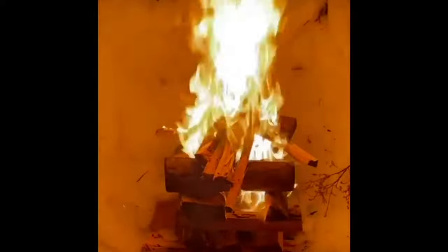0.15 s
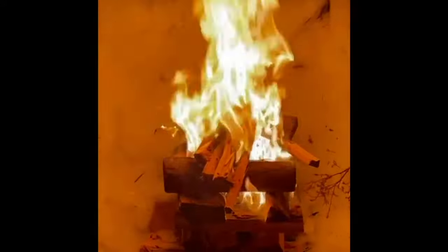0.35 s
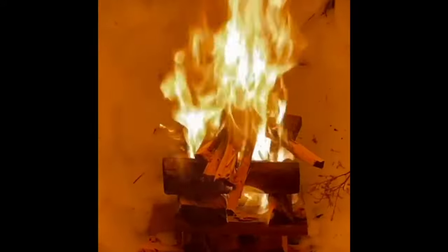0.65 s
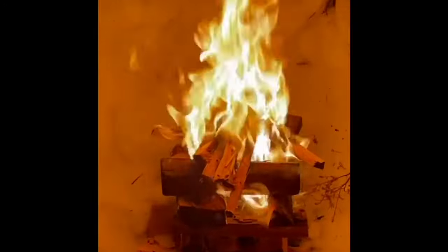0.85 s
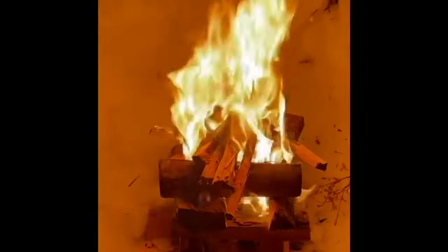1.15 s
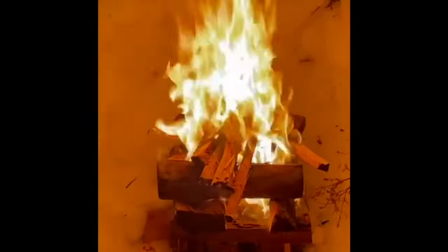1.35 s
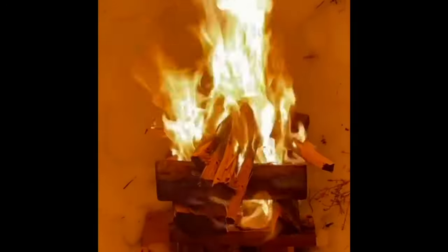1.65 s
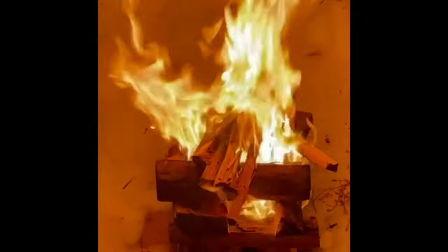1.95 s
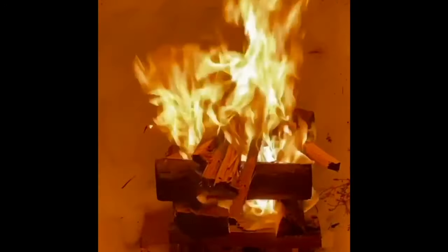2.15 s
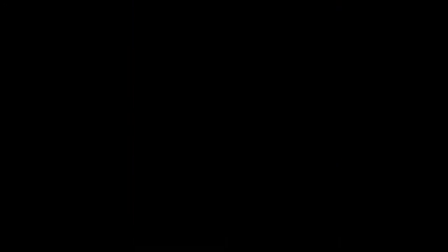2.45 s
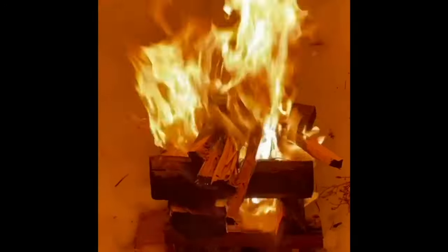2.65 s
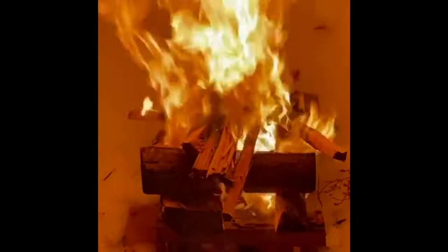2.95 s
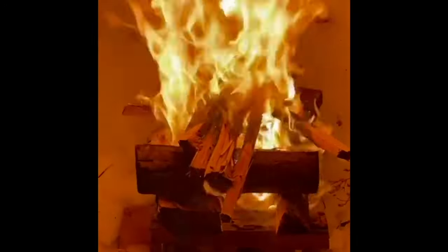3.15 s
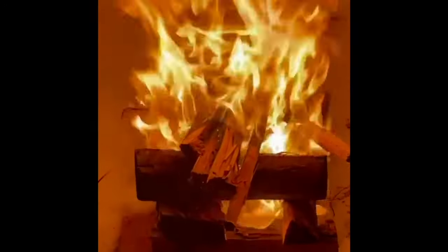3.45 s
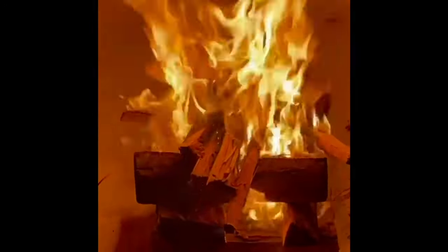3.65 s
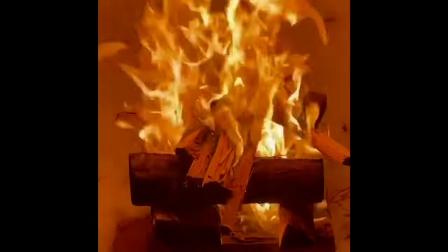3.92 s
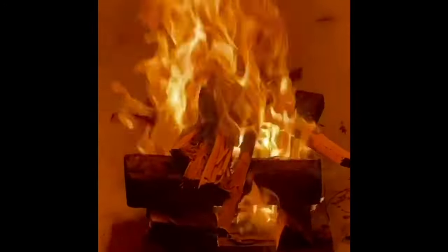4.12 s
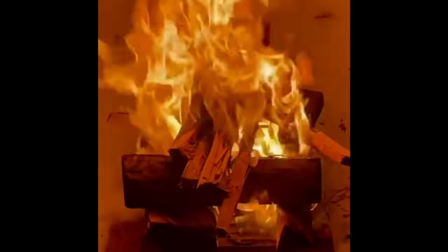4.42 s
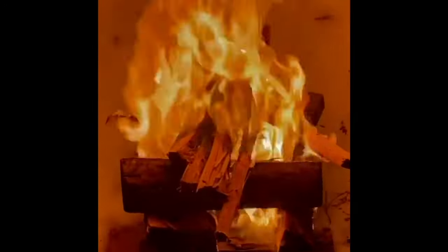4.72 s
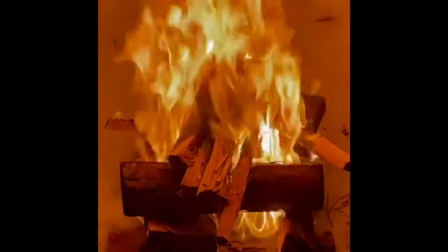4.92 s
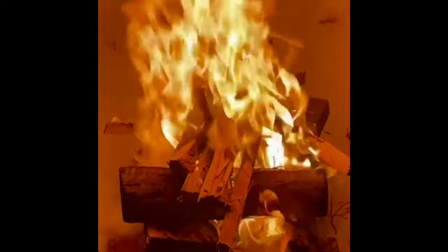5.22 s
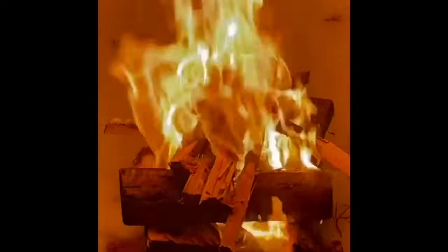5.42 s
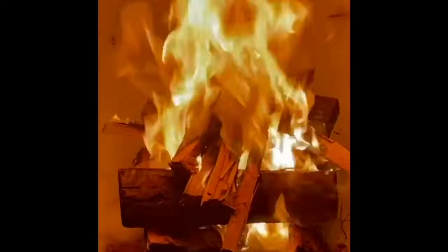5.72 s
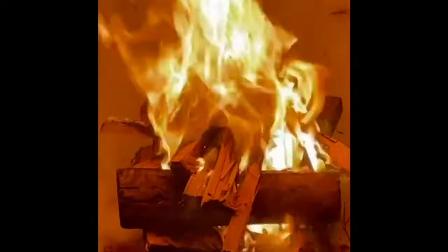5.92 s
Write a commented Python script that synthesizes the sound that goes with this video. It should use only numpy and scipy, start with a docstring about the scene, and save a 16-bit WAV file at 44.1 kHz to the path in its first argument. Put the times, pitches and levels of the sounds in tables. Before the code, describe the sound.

Burning split logs rumble softly and hiss thinly while dry, irregular cracks snap out, the loudest near one, three and six seconds.

```python
"""Brisk log fire outdoors

A stack of split logs burns close to the microphone. Shaped noise makes the rumble, the flickering
draught, the sputtering gas jets and a thin steady hiss. Cells of the wood burst in sharp pops: a spike
with a short tear, ringing through the hollows of the stack, and a quick echo off the logs and the ground.
Pockets of gas escape as soft thumps of falling pitch, most of them in the first second.
Early on, the sound drops out for an instant; the treble stops near 16 kHz throughout."""
import sys
import numpy as np
from scipy import signal
from scipy.fft import rfft, irfft
from scipy.io import wavfile
from scipy.ndimage import uniform_filter1d

SR = 44100
rng = np.random.default_rng(int(sys.argv[2]) if len(sys.argv) > 2 else 0)


def master_out(mix):
    """Clip the mix to full scale and print it as 16-bit PCM to the path in sys.argv[1]."""
    frames = np.transpose(np.atleast_2d(mix))
    ceiling = np.clip(frames, -1, 1)
    pcm = np.round(ceiling * 32767).astype(np.int16)
    wavfile.write(sys.argv[1], SR, pcm)


N = 268128
TIME = np.arange(N) / SR
POP_SIZE = 4096   # samples in one pop
JETS_CALM_DB = -66.5   # gas jets between bouts, before trim; also the most they can blow smoothly


def from_db(db):
    """Decibels to gain."""
    return 10 ** (np.asarray(db) / 20)


def rms_one(x):
    """Scale to an rms of 1."""
    return x / np.sqrt(np.mean(x ** 2) + 1e-20)


def unit_energy(x):
    """Scale to the energy of a single unit click."""
    return x / np.sqrt(np.sum(x ** 2) + 1e-20)


def colour_db(points, size):
    """Level at each frequency of a transform of this size, joined up along a log frequency axis."""
    hz, db = np.transpose(points)
    return np.interp(np.log(np.fft.rfftfreq(size, 1 / SR) + 1), np.log(hz), db)


def coloured(x, points):
    """Give a flat excitation a colour; rms 1."""
    return rms_one(irfft(rfft(x) * from_db(colour_db(points, N)), N))


def noise(points):
    """Steady noise of a given colour; rms 1."""
    return coloured(rng.standard_normal(N), points)


def drift(rate_hz):
    """Smooth random wander with a spread of 1; its spectrum fades out around the given rate."""
    keep = np.exp(-(np.fft.rfftfreq(N, 1 / SR) / rate_hz) ** 2)
    return rms_one(irfft(rfft(rng.standard_normal(N)) * keep, N))


def ring_through(x, db):
    """Minimum-phase filter: resonances ring only after the blow."""
    cepstrum = irfft(np.log(from_db(db)))
    # fold the cepstrum onto positive times
    cepstrum[1:len(x) // 2] *= 2
    cepstrum[len(x) // 2 + 1:] = 0
    return irfft(rfft(x) * np.exp(rfft(cepstrum)))


def add(out, s, sound):
    """Mix a sound in at a time in seconds."""
    start = int(np.clip(round(s * SR), 0, N - 1))
    out[start:start + len(sound)] += sound[:N - start]


def flames(rush_trim_db=-0.97, jets_trim_db=-2.0, rush_flicker_db=2.57, jet_flicker_db=1.0, even_s=0.091):
    """Turbulent burning: a deep rumble, the flickering draught and sputtering jets."""
    # slow swell, before billow and trim: t/s, rumble level/dB, draught level/dB
    swell = [(0.0, -44.5, -63), (0.12, -47.5, -62), (0.32, -43, -61.5), (0.42, -45.0, -62.5),
             (0.78, -47.5, -62.0), (0.88, -43, -63.0), (1.22, -47, -62.5), (1.34, -44.0, -58.5),
             (2.1, -45.5, -62), (2.32, -44.5, -60), (2.56, -48.5, -62.5), (2.86, -43.5, -60.5),
             (3.24, -44.5, -63.0), (3.38, -43.5, -59), (3.6, -46.5, -61.5), (3.74, -45.5, -61.5),
             (5.12, -46.5, -61.5), (5.46, -46, -66.5), (5.72, -46, -62.0), (6.06, -44.5, -61.5)]
    # colour of the rumble: f/Hz, relative level/dB
    rumble_colour = [(15, -47), (25, -33), (40, -6.5), (58, 2), (76, -1.5), (108, -7), (150, -10.5),
                     (190, -12.5), (235, -23), (330, -30.5), (700, -75)]
    # colour of the draught: f/Hz, relative level/dB
    rush_colour = [(150, -13.5), (250, 3), (340, 1), (410, -2.5), (490, 0.5), (620, -2.5), (780, -9.5),
                   (1000, -17.5), (2000, -26.5)]
    rumble_billow_db, rush_billow_db = 1.5, 1.0

    swell_s, rumble_points, rush_points = np.transpose(swell)
    rumble_db = np.interp(TIME, swell_s, rumble_points)
    rush_db = np.interp(TIME, swell_s, rush_points) + rush_trim_db

    billow = drift(7.5)   # on top of the swell the flames billow at random
    licks = drift(47)   # each tongue of flame stirs draught and jets together
    rumble = noise(rumble_colour)
    # even out the noise's own level, leaving swell and billow to shape it
    rumble /= np.sqrt(uniform_filter1d(rumble ** 2, int(even_s * SR)) + 1e-6)
    rumble *= from_db(rumble_db + rumble_billow_db * billow)
    rush = noise(rush_colour) * from_db(rush_db + rush_billow_db * billow + rush_flicker_db * licks)
    jets = sputter(jet_level() + jets_trim_db + jet_flicker_db * licks)
    return rumble + rush + jets


def jet_level(edge_s=0.042):
    """The gas jets idle; each bout opens, holds and closes again. In dB, before trim and flicker."""
    # bouts of sputtering: t/s, length/s, level/dB
    bouts = [(0.88, 0.24, -64.5), (1.278, 0.29, -61.5), (1.674, 0.24, -63), (2.072, 0.256, -60),
             (3.642, 0.11, -61.5)]
    db = np.full(N, JETS_CALM_DB)
    for s, length_s, bout_db in bouts:
        inside_s = np.minimum(TIME - s, s + length_s - TIME)   # time from the nearer edge
        opening = np.clip(0.5 + inside_s / edge_s, 0, 1)
        db = db + opening * (bout_db - JETS_CALM_DB)
    return db


def sputter(level_db, count=700, size_spread_db=4.5):
    """Small gas jets blow smoothly when calm; whatever they push out beyond that comes in separate spits."""
    # colour of the jets: f/Hz, relative level/dB
    jet_colour = [(450, -16), (800, 0), (1100, 2.5), (1600, -0.5), (2000, -1), (2800, -5.5), (6000, -48)]
    sizes = from_db(size_spread_db * rng.standard_normal(count))
    spits = np.zeros(N)
    spits[rng.integers(0, N, count)] = rng.choice([-1, 1], count) * sizes
    smooth = from_db(np.minimum(level_db, JETS_CALM_DB))
    beyond = np.sqrt(np.maximum(from_db(level_db) ** 2 - smooth ** 2, 0))   # the rest of the power
    return smooth * noise(jet_colour) + beyond * coloured(spits, jet_colour)


def pops():
    """The loud bursts, as cells of the wood give way."""
    # bursts: t/s, strength/dB before colouring, then dB relative to 3 kHz: body at 1 kHz, snap at 6 kHz,
    # fizz at 12 kHz; echo/dB relative to the crack (0 at most), ring of the splinter f/Hz
    bursts = [(0.3263,-27.5,-11,3,4,-14,7020), (0.3329,-21.5,-10,-6,-4,-13,2830),
              (0.5968,-16.5,-5,2.5,4,-6,3740), (.648,-11,-5.5,-2.5,-3.5,-14,3300),
              (.6938,-16.5,-3.5,0.5,-4,-8,3080), (1.145,1.5,-2.5,-4,-11,0,3650),
              (1.2959,-14,13,-10,-13,0,614), (1.4163,-18,-6,-11,-11,-3,2650),
              (1.424,-13.5,-4,-15,-10,-12,2790), (1.9213,-3.5,0,-16,-19,-16,3170),
              (2.2564,-12.5,-11,-4.5,0.5,-22,3000), (2.4104,-24.5,4,-16,-10,0,700),
              (2.5344,-17.5,-6,-12,-9,0,3300), (2.6746,-22,-15,-9,-5,-16,2700),
              (2.8556,-14.5,-2,-1,2,-15,2980), (2.8647,-13,1,-7,-4,-4,3400),
              (3.048,-16.5,-1,-2.5,-2,-9,5200), (3.0864,4,-11,-11,-2.5,-7,3350),
              (3.7284,-8,-1,-10,-3.5,-12,14000), (3.7307,-17,1,5.5,0,-17,14000), (4.171,-25,5,0,3,6,1150),
              (4.516,-23.5,-4,1,1,-12,3060), (4.5641,-1,1,-3.5,3,0,2620), (4.647,-24,0,-1,3.5,-1,2600),
              (4.8575,-8.5,-7.5,-7,-8.5,0,2850), (5.1976,-3,0,-7.5,-8,-16,2680),
              (5.369,-19,-5,-4,-2,-2,3000), (5.3786,2,-4,0,2.5,-27,3150), (5.9883,6.5,-6,-2,3,0,3500)]
    out = np.zeros(N)
    for s, db, *colour in bursts:
        add(out, s, from_db(db) * pop(*colour))
    return out


def pop(body_db, snap_db, fizz_db, echo_db, ring_hz, ring_db=5, ring_width=0.16,
        tear_s=0.00019, tear_db=1, echo_s=0.00188, echo_width_s=0.001,
        tail_s=0.0029, tail_db=-12, far_s=0.017, far_db=-25):
    """A spike and a brief tearing of fibres, then echoes off the logs and a faint scatter from the yard."""
    # hollows between the logs colour every pop: f/Hz, level/dB
    stack = [(100, -26), (300, -9), (550, 0), (830, -4), (1150, 0), (1600, -3.5), (2000, -9), (2450, -2),
             (3400, -2), (4200, -4), (5200, -0.5), (6700, -3.5), (8000, -1), (14000, -5.5), (16000, -3)]
    t = np.arange(POP_SIZE) / SR
    tear, near, tail, far = rng.standard_normal((4, POP_SIZE))

    crack = from_db(tear_db) * unit_energy(tear * t * np.exp(-2 * t / tear_s))
    crack[0] = 1   # the spike
    echo_gain = from_db(min(echo_db, 0))   # an echo never has more energy than its crack
    echo = echo_gain * unit_energy(near * np.exp(-np.abs(t - echo_s) / echo_width_s))
    arrived = 1 - np.exp(-(t / echo_s) ** 2)   # scatter builds up over the echo delay
    scatter = from_db(tail_db) * unit_energy(tail * arrived * np.exp(-t / tail_s))
    scatter += from_db(far_db) * unit_energy(far * arrived * np.exp(-t / far_s))
    burst = unit_energy(unit_energy(crack) + echo) + scatter

    # flatten the burst but for its fine ripple, then colour it
    broad_db = 10 * np.log10(uniform_filter1d(np.abs(rfft(burst)) ** 2, size=70))
    wood = [(1400, body_db), (2400, 0), (3800, 0), (5200, snap_db), (7500, snap_db), (10000, fizz_db)]
    detune = np.fft.rfftfreq(POP_SIZE, 1 / SR) / ring_hz - 1
    splinter_db = ring_db / (1 + (detune / ring_width) ** 2)   # one damped resonance
    tone_db = colour_db(wood, POP_SIZE) + splinter_db + colour_db(stack, POP_SIZE)
    return ring_through(burst, tone_db - broad_db)


def puffs(cycles_per_e=1.797, opening_s=0.0013, rough=0.22, rough_hz=1350, rough_s=0.023):
    """Released gas swells, so its pressure swings ever more slowly; turbulence roughens the start."""
    # escaping gas pockets: t/s, level/dB before colouring, growth time of the period/s, length/s
    pockets = [(0.02, -48, 0.0014, 0.01), (0.077, -43, 0.0028, 0.014), (0.12, -43, 0.002, 0.02),
               (0.195, -41, 0.0021, 0.0094), (0.231, -45, 0.0016, 0.013), (0.288, -46, 0.0013, 0.011),
               (.313, -43, 0.0018, 0.048), (0.398, -45, 0.0024, 0.019), (0.595, -51, 0.001, 0.011),
               (1.294, -23.5, 0.0021, 0.02), (2.409, -43.5, 0.00065, 0.013), (2.8655, -37, 0.0024, 0.015),
               (2.873, -36.5, 0.00229, 0.025), (5.197, -35, 0.001, 0.017), (5.3800, -39.5, 0.0012, 0.024)]
    # gaps of the stack that the gas is heard through: f/Hz, level/dB
    gaps = [(40, 1.5), (120, 0.5), (190, -1), (280, -10.5), (420, -5.5), (610, 0.5), (830, -8), (1200, -11),
            (2500, -3.5), (6000, 1)]
    out = np.zeros(N)
    t = np.arange(2 * POP_SIZE) / SR
    eddy_filter = signal.butter(2, rough_hz, fs=SR, output="sos")
    for s, db, growth_s, length_s in pockets:
        # cycles run with the log of time, so the pitch falls
        swing = np.sin(2 * np.pi * cycles_per_e * np.log1p(t / growth_s))
        swell = (1 - np.exp(-t / opening_s)) * np.exp(-(t / length_s) ** 2 / 2)
        eddies = rms_one(signal.sosfilt(eddy_filter, rng.standard_normal(len(t))))
        puff = swing * swell + rough * eddies * np.exp(-t / rough_s)
        add(out, s, from_db(db) * ring_through(puff, colour_db(gaps, len(t))))
    return out


def ticks(count=45, level_db=-34, level_spread_db=2, dull_db=-3, colour_spread_db=2,
          ring_hz=3000, ring_spread=0.18):
    """Tiny bursts at random times, built like the pops but far weaker."""
    out = np.zeros(N)
    times = rng.uniform(0, N / SR, count)
    chances = rng.standard_normal((count, 6)).clip(-2, 2)   # level, ring, then body, snap, fizz, echo
    for s, chance in zip(times, chances):
        colour = dull_db + colour_spread_db * chance[2:]
        tick = pop(*colour, ring_hz * np.exp(ring_spread * chance[1]))
        add(out, s, from_db(level_db + level_spread_db * chance[0]) * tick)
    return out


def hiss(level_db=-60):
    """A thin, even hiss behind the fire: steady noise of a fixed colour."""
    # colour of the hiss: f/Hz, relative level/dB
    hiss_colour = [(1200, -18), (2000, -25), (2400, 0.5), (2750, 5.5), (3300, 5), (3750, 0), (5000, 0.5),
                   (7200, -1.5), (8100, 2.5), (8800, -3.5), (9700, 2.5), (12500, -3.5), (14500, 2.5),
                   (16000, -3)]
    return noise(hiss_colour) * from_db(level_db)


def scene():
    """The whole fire, heard from one spot on one microphone."""
    return (flames() + pops() + puffs() + ticks() + hiss())[None]


def record(dry):
    """The sound drops out once, with short ramps; a steep low-pass cuts the top."""
    drop_start_s, drop_end_s, drop_db, cutoff_hz = 0.793, 0.877, -52, 15900
    present = 1.0 * ((TIME < drop_start_s) | (TIME > drop_end_s))
    heard = uniform_filter1d(present, size=200)   # ramps, in samples
    top_cut = signal.ellip(10, 0.2, 80, cutoff_hz, fs=SR, output="sos")
    return signal.sosfilt(top_cut, dry * np.maximum(heard, from_db(drop_db)))


dry = scene()
out = record(dry)
master_out(out)
```